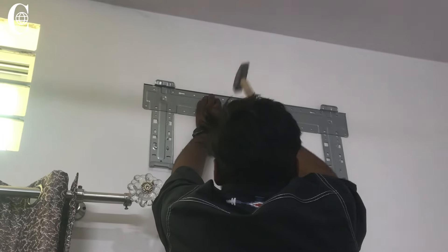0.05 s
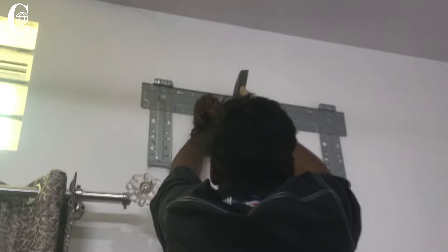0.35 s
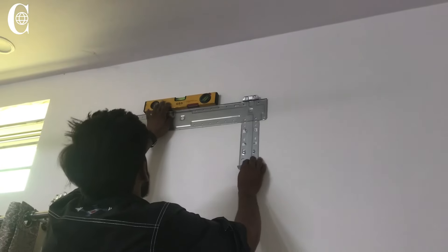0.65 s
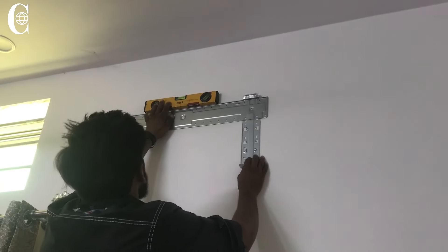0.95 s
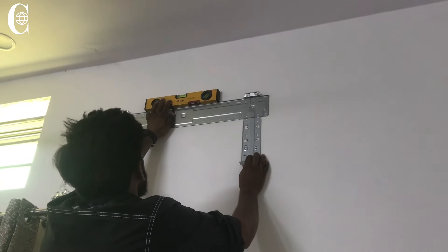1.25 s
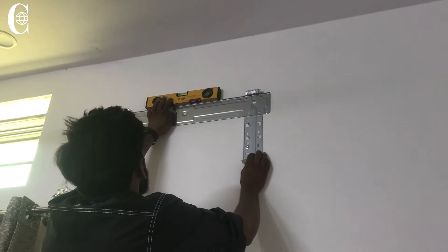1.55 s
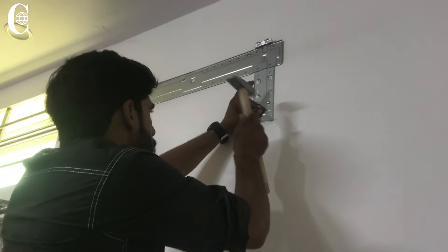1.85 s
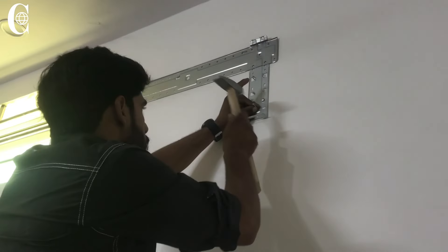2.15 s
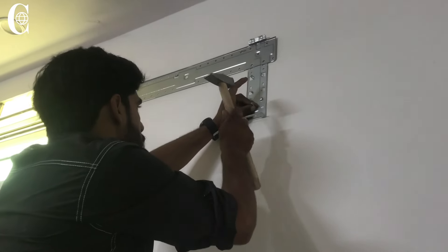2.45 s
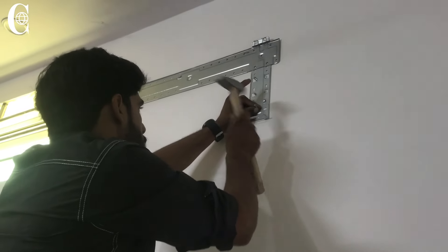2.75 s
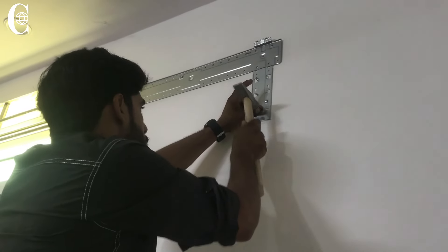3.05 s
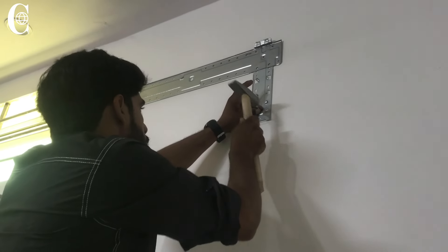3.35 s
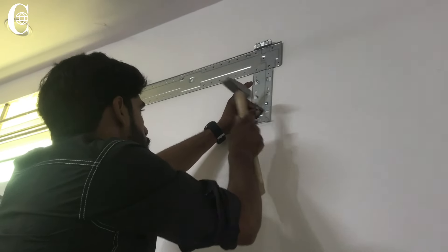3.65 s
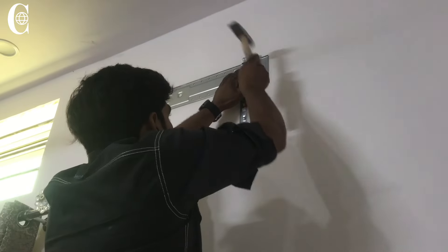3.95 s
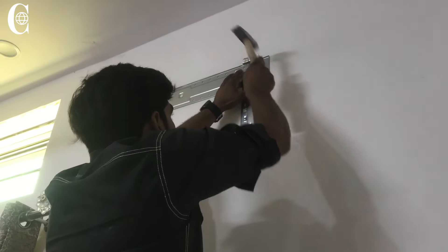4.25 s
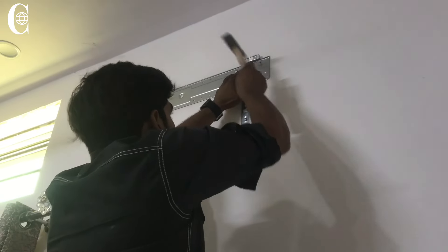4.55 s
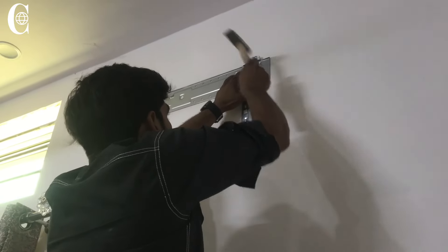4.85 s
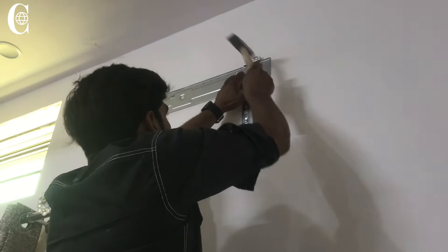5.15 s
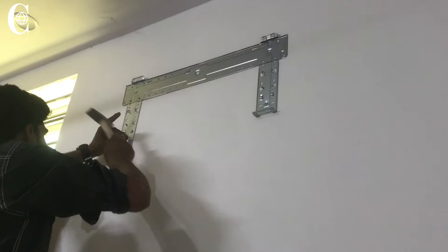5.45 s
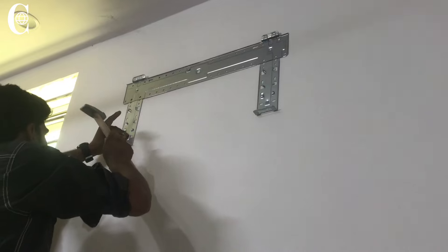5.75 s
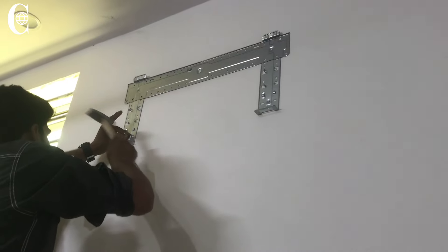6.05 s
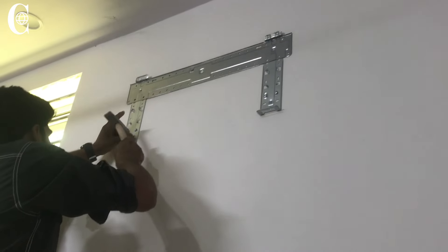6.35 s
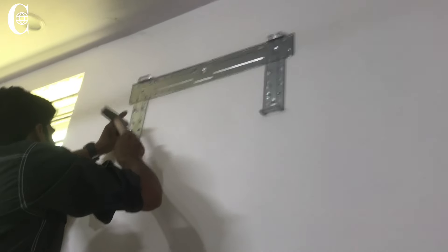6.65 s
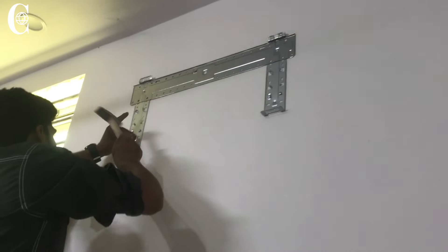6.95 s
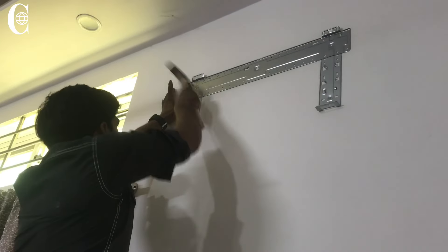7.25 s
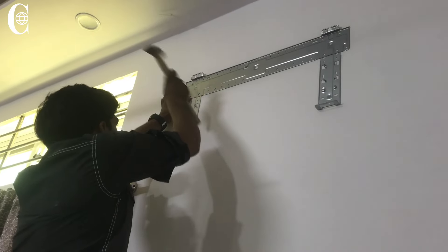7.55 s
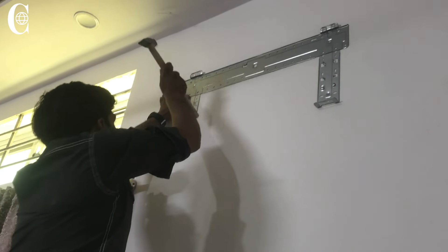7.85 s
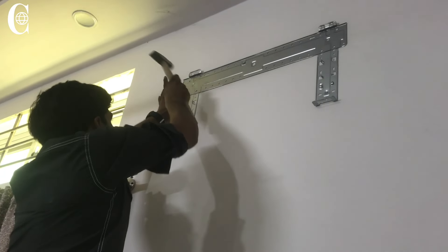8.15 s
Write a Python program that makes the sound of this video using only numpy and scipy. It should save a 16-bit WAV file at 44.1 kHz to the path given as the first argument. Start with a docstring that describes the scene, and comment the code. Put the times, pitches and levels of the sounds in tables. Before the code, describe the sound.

A hammer hits a steel mounting plate once, with a clank, a wall thud and a low boom. In the pause, a spirit level scrapes faintly on the metal. Steady hammering follows in four back-to-back runs, each with its own tone: bright, then duller and heavier, then sharp, then more ringing. The microphone picks up the bare room's echo and steady air noise.

```python
"""A hammer fixes a steel plate to a brick or stone wall in a bare room, over steady air noise.
First comes one blow: the plate clanks, the wall thuds and the room booms. In the pause after it,
a spirit level scrapes lightly on the plate. Then come four runs of blows, each on its own spot.
The spot decides how bright the clank is, and in some runs the thud grows as the fixing goes in.
The level dips briefly after the first blow and before each run."""
import sys
import numpy as np
from scipy import signal
from scipy.io import wavfile

SR = 44100
rng = np.random.default_rng(int(sys.argv[2]) if len(sys.argv) > 2 else 0)


def master(y):
    """Save y as 16-bit WAV."""
    cut = np.clip(np.atleast_2d(y).T, -1, 1)
    pcm = np.round(cut * 32767)  # scale
    wavfile.write(sys.argv[1], SR, pcm.astype(np.int16))


N = 361619
T = np.arange(int(.8 * SR)) / SR  # the seconds of one blow or scrape
# when each of the five struck spots is heard: start_s, end_s
SPOT_TIMES = [(-.03, .392), (1.717, 3.732), (3.732, 5.315), (5.315, 7.043), (7.043, 8.3)]
# tone of the steel at each spot: pitch_hz, level_db
TOP_MIDDLE = [(240, -41), (400, 3), (893, -14.5), (1110, -0.5), (1330, -13), (1790, -12), (2090, -18),
              (2550, -17.5), (3690, -15.5), (7060, -13), (16000, -26)]
RIGHT_ARM = [(240, -22), (400, -62), (560, -7), (800, -28.5), (1100, -6.5), (1500, -5), (2100, 0.5),
             (3000, 0), (4000, 5), (5000, 3.5), (6500, 4), (7500, 0.5), (9200, 5), (10400, -3), (12500, 3),
             (16000, -2)]
RIGHT_CORNER = [(240, -32), (400, -30), (545, 3), (880, -15.5), (1130, -1.5), (1480, -4.5), (1700, -9),
                (2050, -15), (2400, -12), (2780, -14.5), (3050, -15.5), (8000, -13), (10400, -20.5),
                (11600, -14.5), (16000, -27)]
LEFT_ARM = [(240, -31), (400, 0), (650, 4), (850, -5), (1250, -5.5), (1650, 1), (2700, -1.5), (4050, 3),
            (5000, 2.5), (7400, 0), (9000, -1.5), (10400, -8), (12800, -1), (16000, -10.5)]
LEFT_CORNER = [(240, -43), (400, -10.5), (900, -12), (1300, -6), (1800, -0.5), (2200, -1.5), (3200, -5),
               (4500, -5.5), (7500, -12.5), (9000, -10.5), (10500, -15.5), (12800, -13), (16000, -20)]


def amp(db):
    """Turns decibels into a gain."""
    return 10 ** (np.asarray(db) / 20)


def unit(x, size=3000):
    """Scales a sound so that its first samples have an average (rms) level of 1."""
    return x / np.sqrt(np.mean(x[:size] ** 2) + 1e-20)


def read(points, hz):
    """Reads between a table's rows, with octaves evenly spaced."""
    pitch_hz, value = np.transpose(points)
    return np.interp(np.log(hz + 1), np.log(pitch_hz + 1), value)


def add(mix, start_s, sound):
    """Mixes a sound in at start_s, which may be below zero."""
    at = round(start_s * SR)
    sound = sound[max(-at, 0):]
    part = mix[max(at, 0):][:len(sound)]
    part += sound[:len(part)]


def later(x, delay_s):
    """The same sound, delayed."""
    return np.pad(x, (max(int(delay_s * SR), 0), 0))[:len(x)]


def colour(x, points, tilt_db=0, size=4096):
    """Gives a sound the tone in a table, plus tilt_db for each octave above 1000 Hz."""
    hz = abs(np.fft.fftfreq(size, 1 / SR))
    octaves = np.log2(np.maximum(hz, 1000) / 1000)
    log_gain = np.log(amp(read(points, hz) + tilt_db * octaves))
    taps = np.fft.ifft(np.exp(np.conj(signal.hilbert(log_gain)))).real  # never rings ahead of a hit
    return signal.oaconvolve(x, taps[:size // 2])[:len(x)]


def dying(decay_s):
    """A fade that falls by 60 dB in decay_s."""
    return np.exp(-np.log(1000) * T / max(decay_s, 1e-3))


def tones(table):
    """One dying tone for each row."""
    return np.array([amp(db) * dying(decay_s) * np.sin(2 * np.pi * hz * T) for hz, db, decay_s in table])


def alike(pattern, share):
    """Noise that is partly a given pattern and partly new."""
    share = np.clip(share, 0, 1)
    return np.sqrt(share) * pattern + np.sqrt(1 - share) * rng.standard_normal(len(pattern))


def air(level_db=-41.5):
    """Steady air noise in the room."""
    # tone of the air: pitch_hz, level_db
    air_tone = [(18, -54), (30, -10), (145, -6), (161, -1), (364, -6), (394, -6), (437, -8), (632, -9.5),
                (1010, -7), (2350, -14.5), (2980, -17.5), (7870, -36.5), (8980, -36), (16000, -45.5)]
    return amp(level_db) * unit(colour(rng.standard_normal(N), air_tone), size=N)


def room_tail(noise, build_s=0.0043):
    """Crowded echoes build up after a blow; the treble dies first."""
    # how long the room rings: pitch_hz, decay_s
    room_decay = [(100, 5.5), (250, 1), (500, 0.5442), (1200, 0.37), (3000, 0.4667), (6500, 0.4724),
                  (13000, 0.3143)]
    # tone of its echoes: pitch_hz, level_db
    room_tone = [(200, -6.5), (1000, 5.5), (3000, 6), (6000, -2.5), (13000, 2.5)]
    hz, t, bands = signal.stft(noise, SR, nperseg=256)
    fade = np.exp(-np.log(1000) * t / read(room_decay, hz)[:, None])
    bands = bands * amp(read(room_tone, hz))[:, None] * fade
    return signal.istft(bands, nperseg=256)[1][:len(T)] * (1 - np.exp(-(T / build_s) ** 2))


def room_rumble(level_db=-25, swell_s=0.025):
    """The room's deepest tones swell after a blow and die away."""
    # deep room tones: pitch_hz, level_db, decay_s
    deep_tones = [(44.4, -4, 1), (62.7, 6.5, 0.34), (73, -6, 1), (95, -20, 0.71)]
    return amp(level_db) * unit(tones(deep_tones).sum(0) * (1 - np.exp(-T / swell_s)), size=8000)


def low_echoes(pitch_hz=205, width_s=0.0059, spread_octaves=0.17):
    """The far walls throw the thud back as short, low throbs."""
    # echoes: delay_s, level_db
    echoes = [(0.023, -9.5), (0.049, -5.5), (0.0724, -4), (.087, -10.5), (0.111, -12.5)]
    pitches = pitch_hz * 2 ** (spread_octaves * rng.standard_normal(len(echoes)))
    return sum(amp(db) * np.sin(2 * np.pi * hz * (T - s)) * np.exp(-((T - s) / width_s) ** 2)
               for (s, db), hz in zip(echoes, pitches))


def scrapes(gain_db=-9, rise_s=0.002, decay_s=0.11, squeak_db=7):
    """The spirit level slides on the plate, metal on metal: faint hisses with a slight squeak."""
    # slides: start_s, level_db, pitch_hz
    slides = [(0.6091, -43, 6410), (0.667, -43, 6500), (0.7163, -44, 6900), (0.8715, -40, 6710),
              (1.1364, -41, 9220), (1.1598, -40, 11500)]
    # tone of the rubbing: pitch_hz, level_db
    rub_tone = [(1500, -25), (4000, -3), (6500, 2), (9200, 1), (10500, -5), (12500, 2), (16000, -4)]
    out = np.zeros(N)
    for start_s, db, hz in slides:
        hiss = colour(rng.standard_normal(len(T)), rub_tone)
        rub = unit(colour(hiss, [(hz * .88, 0), (hz, squeak_db), (hz * 1.12, 0)]))
        add(out, start_s, amp(db + gain_db) * rub * dying(decay_s) * (1 - np.exp(-T / rise_s)))
    return out


def wall_thud(noise, tail, boom, knock_db, echo_db, boom_db, decay_s=0.052, swell_s=0.015):
    """The wall gives a dull knock, echoes throb, and a boom swells and hangs in the room."""
    # tone of the knock: pitch_hz, level_db
    knock_tone = [(30, -33), (80, -17.5), (145, 1), (200, -4.5), (270, 0.5), (340, -6), (450, -11.5),
                  (700, -14), (1500, -61.5)]
    knock = colour(amp(knock_db) * unit(noise * dying(decay_s)) + unit(tail), knock_tone)
    hum = boom * (1 - np.exp(-T / swell_s))
    parts = [(knock, 0), (hum, boom_db), (low_echoes(), echo_db)]
    return unit(sum(amp(db) * unit(part, size=4400) for part, db in parts), size=4400)


def plate_tones(bite_hz, fall_db_per_octave=9, detune=0.0091):
    """Tones near the struck part's pitch ring most; each blow shifts their pitches a little."""
    # clear tones of the plate: pitch_hz, level_db, decay_s
    clear_tones = [(1052, -3.5, 0.21), (1123.5, 3.5, 0.17), (1452, 7, 0.096), (1566, -9.5, 0.18),
                   (1794, -1, 0.082), (2004, -34, 0.11), (2202, -3, 0.15), (2330, -14, 0.13),
                   (2570, -8.5, 0.11), (2690, 9, 0.031), (2897, 10.5, 0.012), (3195, 5, 0.11),
                   (3390, -10, 0.037), (3680, -34, 0.044), (3920, 5, 0.024), (3990, -11, 0.027),
                   (4200, 12, 0.036), (4340, -11.5, 0.056), (4500, 7, .06), (5380, -4, 0.031),
                   (6100, 23, 0.022), (6420, -8, 0.085), (6700, 10, 0.044), (8400, 12, 0.14)]
    shifts = 1 + detune * rng.standard_normal(len(clear_tones))
    return tones([(hz * shift, db - fall_db_per_octave * abs(np.log2(hz / bite_hz)), decay_s)
                  for (hz, db, decay_s), shift in zip(clear_tones, shifts)])


def rippled(tone, ripple_db=2.1, spacing_hz=140):
    """The plate's crowded vibrations put narrow peaks and dips in its tone; it gives no deep bass."""
    hz = spacing_hz * np.arange(2, 125)
    ripple = ripple_db * np.minimum(hz / 3000, 1) * rng.standard_normal(len(hz))
    return np.vstack([(40, -55), np.c_[hz, read(tone, hz) + ripple]])


def steel_clank(noise, tail, plate, bite, decay_s, slap_db, ring_db, direct_db, slap_s=0.0041):
    """The hammer hits, the plate clanks and slaps the wall, and the room answers."""
    shape = dying(decay_s)
    shape = np.hypot(shape, amp(slap_db) * later(shape, slap_s * rng.uniform(0.2, 1.4)))
    shape = np.hypot(shape, amp(2) * dying(0.02))  # the hard first contact
    direct = unit(colour(noise * shape, [(1000, 0)], tilt_db=1.85)) + bite  # brighter than its echoes
    clank = unit(amp(direct_db - 2) * direct + unit(tail))
    # the room holds the plate's clear tones for a while
    weights = amp(2 * rng.standard_normal(len(plate))) * rng.choice([-1, 1], len(plate))
    ring = signal.fftconvolve(weights @ plate, tail)[:len(T)]
    return clank + amp(ring_db + 4) * unit(ring)


def driving(start_s, end_s, fixing, settle_blows=2.2, tilt_per_db=0.5):
    """As a fixing goes in, the steel dulls and, at some spots, more of each blow reaches the wall."""
    # hammer blows: start_s, strength_db
    blows = [(0.3232, -23), (1.8057, -18.5), (2.0784, -18), (2.339, -17.5), (2.5955, -17), (2.849, -18),
             (3.099, -17.5), (3.3421, -18), (3.5843, -17.5), (3.8741, -24), (4.1791, -23.5),
             (4.4758, -22.5), (4.783, -22), (5.0775, -21.5), (5.3911, -19), (5.6374, -18), (5.89, -18.5),
             (6.1336, -18), (6.3779, -20.5), (6.6257, -19), (6.8563, -19), (7.3066, -16.5), (7.6522, -17),
             (8.014, -14.5)]
    thud_db, loose_db, first_tilt_db, dulling_db = fixing
    times, strength_db = np.transpose([row for row in blows if start_s < row[0] < end_s])
    count = np.arange(len(times))
    wall_db = strength_db + thud_db - loose_db * np.exp(-count / settle_blows)
    brighter_db = tilt_per_db * (strength_db - strength_db.mean())  # harder blows sound brighter
    tilt_db = first_tilt_db - dulling_db * count + brighter_db
    return list(zip(times, strength_db, wall_db, tilt_db))


def hammering(start_s, end_s, spot, fixing, path, gain_db=1, bite_decay_s=0.029):
    """All the blows on one spot sound alike: each is a clank, a thud and a rumble."""
    # booming tones of wall and room: pitch_hz, level_db, decay_s
    boom_tones = [(99.5, -1, 0.84), (142.1, -1.5, 0.28), (172.4, -7.5, 2.9), (195.4, 2.5, 0.54),
                  (209.8, -6.5, 1.67), (242.8, 1.5, 0.22), (259.3, -8, 1.03), (547, -7, 0.59),
                  (645, -14.5, 0.74)]
    tone, decay_s, slap_db, bite_hz, bite_db, ring_db, boom_db, share, age_s, earlier_db = spot
    direct_db, knock_db, echo_db = path
    blows = driving(start_s, end_s, fixing)
    # a blow from just before start_s, heard only as it dies away
    earlier = (start_s - age_s, blows[0][1] + earlier_db, blows[0][2] + earlier_db - 1, 0)
    plate_noise, wall_noise, room_noise = rng.standard_normal((3, len(T)))
    boom = rng.choice([-1, 1], len(boom_tones)) @ tones(boom_tones)
    rumble = room_rumble()
    # three close, short tones of the struck part give the hit its bite
    cluster = np.array([1, -1, 1]) @ tones([(bite_hz * k, 0, bite_decay_s) for k in (.93, 1, 1.075)])
    bite = amp(bite_db - 7) * unit(cluster)
    tone = rippled(tone)
    out = np.zeros(N)
    for blow_s, clank_db, wall_db, tilt_db in [earlier] + blows:
        tail = room_tail(alike(room_noise, share))
        plate = plate_tones(bite_hz)
        noise = alike(plate_noise, share)
        clank = steel_clank(noise, tail, plate, bite, decay_s, slap_db, ring_db, direct_db)
        clank = amp(clank_db) * unit(colour(clank, tone, tilt_db))
        thud = amp(wall_db) * wall_thud(alike(wall_noise, share), tail, boom, knock_db, echo_db, boom_db)
        force = np.hypot(amp(clank_db), amp(wall_db))  # the rumble feels the whole blow
        add(out, blow_s, amp(gain_db) * (clank + thud) + force * rumble)
    t = np.arange(N) / SR
    return out * (t >= start_s) * (t < end_s)


def scene():
    """The hammer works on five spots in turn, with the scrapes and the room's air."""
    # how each spot sounds: tone, clank_decay_s, slap_db, bite_hz, bite_db, ring_db, boom_db,
    # repeated_share (0-1), earlier_blow_age_s, earlier_blow_db
    spots = [(TOP_MIDDLE, 0.045, -2.06, 3700, -2.1, -25, -2.8, 1, .015, 0.39),
             (RIGHT_ARM, 0.13, -2.9, 3650, -27, -20.5, -3.5, 0.51, .4, -1.15),
             (RIGHT_CORNER, 0.035, -20, 2520, 0, -23.5, -7, 0.69, 0.33, 0.019),
             (LEFT_ARM, 0.031, 5.4, 3900, -8, -21.5, -1.5, 0.69, 0.15, -3),
             (LEFT_CORNER, 0.22, -7, 2300, -7.5, -21.5, 0.69, 0.18, .085, -1.1)]
    # how each fixing takes the hammer: thud_db, thud_lost_while_loose_db,
    # first_brightness_db_per_octave, dulling_each_blow_db_per_octave
    fixings = [(1, 1.5, -.5, 0), (-7.5, 7, -1.71, 0.07), (0.6, -2.5, 0.24, 0.32), (-9.5, 2.5, .5, 0.31),
               (-8.5, -0.5, 1.9, 1.14)]
    # what reaches the listener from each spot: direct_clank_db, direct_knock_db, low_echoes_db
    paths = [(4.5, -5.5, -1.5), (4.5, -11, -0.5), (8.3, -2.5, 1), (4, -1, -9.5), (4.5, -11.5, -11.5)]
    blows = sum(hammering(*times, spot, fixing, path)
                for times, spot, fixing, path in zip(SPOT_TIMES, spots, fixings, paths))
    return (blows + scrapes() + air())[None]


def record(dry, fade_s=0.022, ceiling=9.3, low_cut_hz=34, high_cut_hz=16050):
    """Trims deep bass and top treble, rounds peaks, and dips the level as a spot starts or ends."""
    t = np.arange(N) / SR
    dry = signal.sosfilt(signal.butter(4, low_cut_hz, "highpass", fs=SR, output="sos"), dry)
    dips = [np.where(t < s, 1, np.clip((t - s) / fade_s, 0, 1)) for s in np.unique(SPOT_TIMES)]
    rounded = ceiling * np.tanh(dry * np.prod(dips, axis=0) / ceiling)
    high_cut = signal.firwin(511, high_cut_hz, window=("kaiser", 9), fs=SR)
    return signal.oaconvolve(rounded, high_cut[None], "same")


dry = scene()
out = record(dry)
master(out)
```